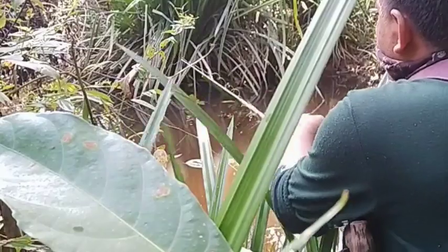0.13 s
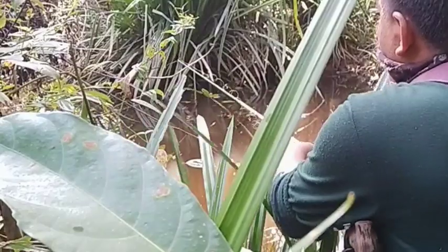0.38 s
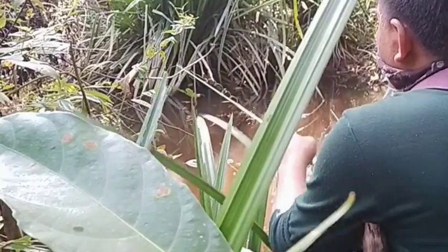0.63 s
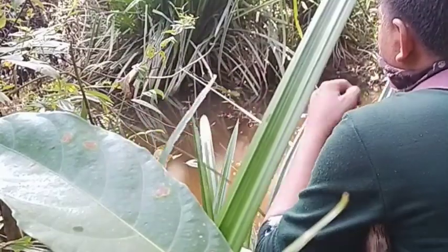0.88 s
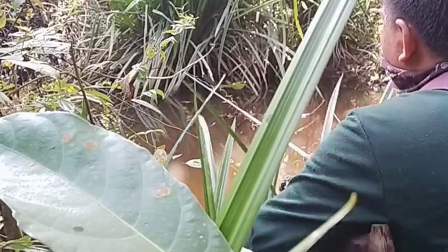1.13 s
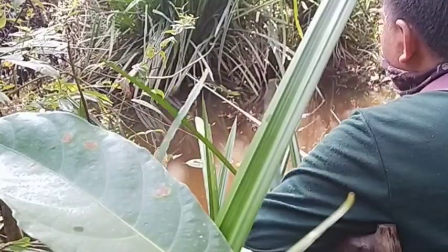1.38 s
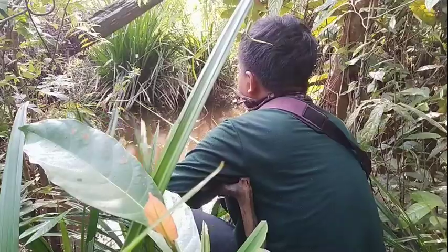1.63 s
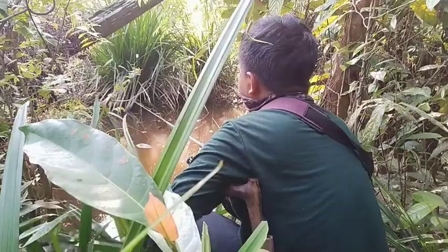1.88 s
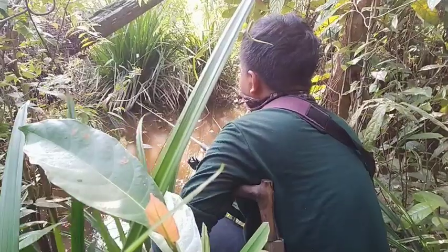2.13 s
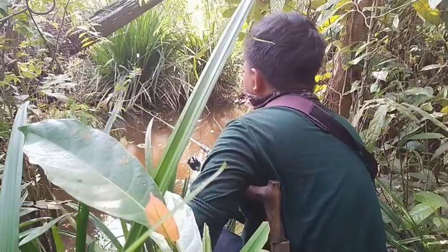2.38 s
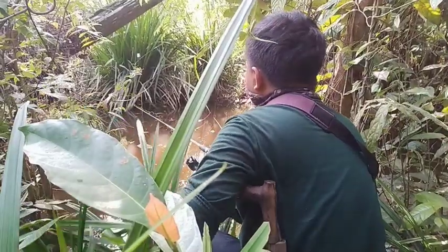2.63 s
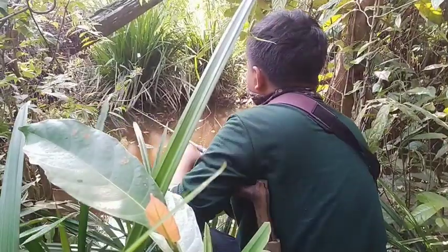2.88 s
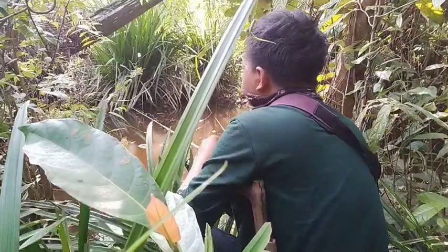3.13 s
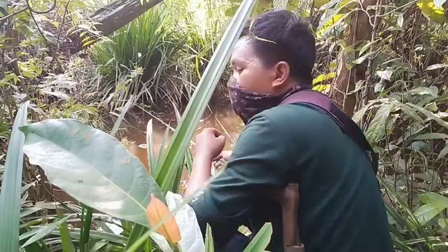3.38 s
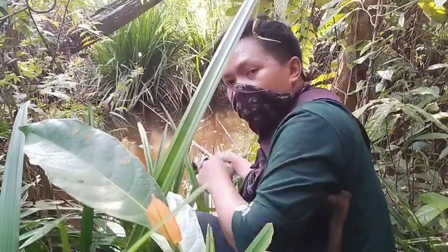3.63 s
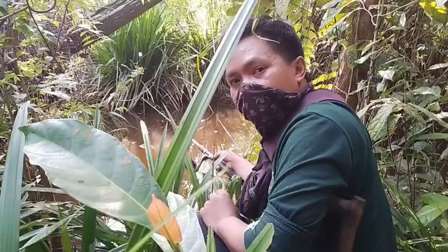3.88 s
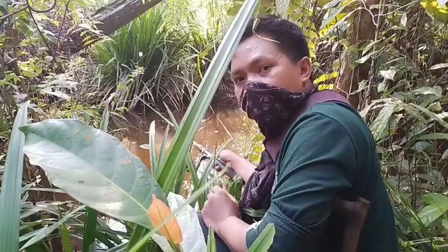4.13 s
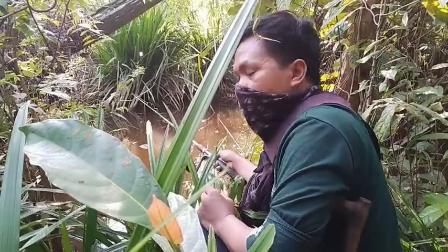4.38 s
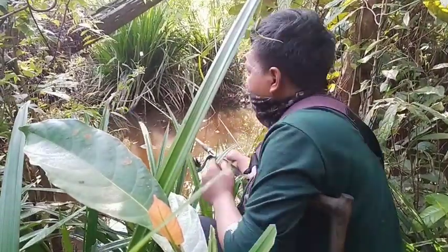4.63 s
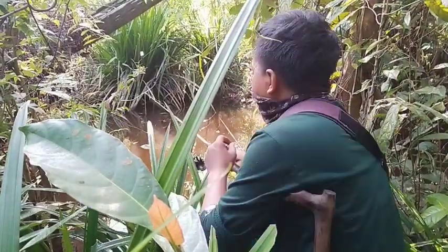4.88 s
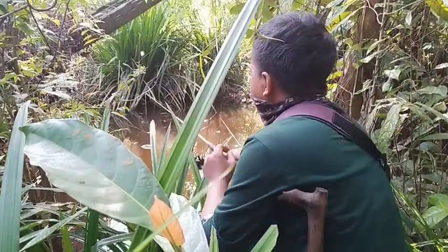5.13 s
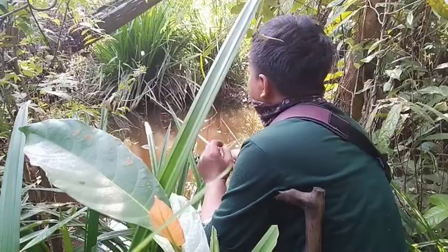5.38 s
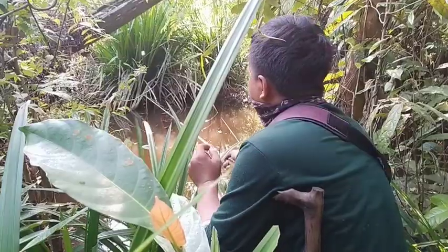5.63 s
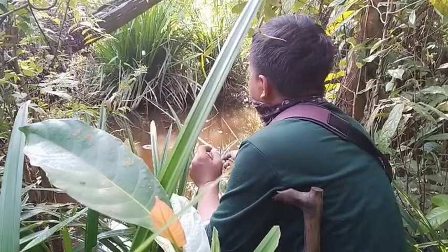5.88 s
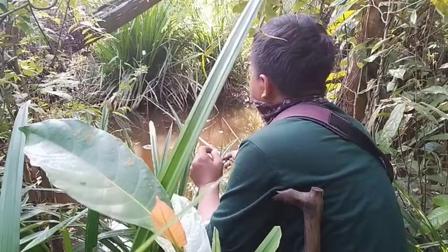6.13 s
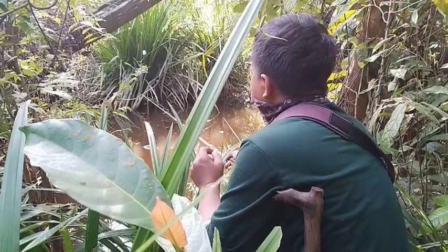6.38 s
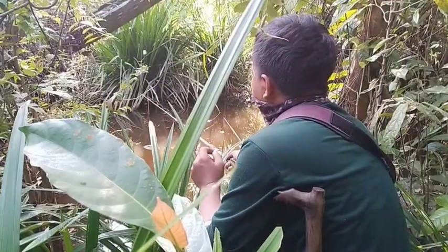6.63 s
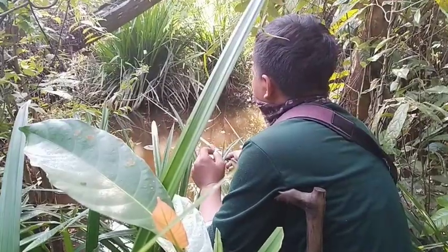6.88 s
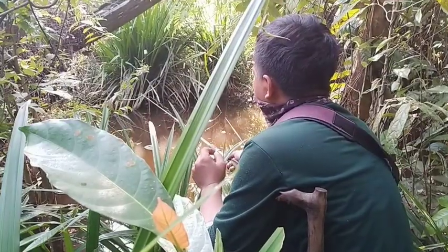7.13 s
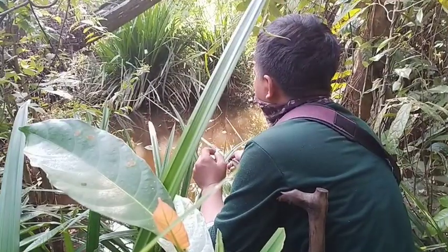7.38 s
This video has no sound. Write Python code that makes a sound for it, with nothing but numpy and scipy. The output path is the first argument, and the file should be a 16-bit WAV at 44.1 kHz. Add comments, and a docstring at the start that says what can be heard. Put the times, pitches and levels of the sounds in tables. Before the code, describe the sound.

Beside a forest creek by day, cicadas drone continuously in shimmering high bands over thin cricket tones and a soft watery wash. Birds give quick whistled notes, buzzing trills and low rolling calls, answered by woody echoes. Around 1.5 seconds a tiny dip marks a splice, then someone crouched near the microphone brushes dry leaves loudly and snaps twigs for about a second, fading to sparse rustles.

```python
"""Forest creek bank by day

Cicadas drone in two high bands with an overtone, two thin cricket tones throb, and creek and far leaves wash.
Near-sine birds glide through hooked notes, whistles and fast trills, or roll low; tapped echoes answer from trees.
Someone crouching near the microphone brushes leaves (crackle and hiss) and snaps twigs (short bursts and modes).
At 1.5 s a splice: the level drops for a moment, and louder brushing follows."""
import sys
import numpy as np
from scipy import signal
from scipy.fft import rfft, irfft
from scipy.io import wavfile
from scipy.ndimage import uniform_filter1d

SR = 44100
rng = np.random.default_rng(int(sys.argv[2]) if len(sys.argv) > 2 else 0)


def gain_from_db(level_db):
    """Turn a decibel level (scalar or array-like) into a linear amplitude factor."""
    decades = np.asarray(level_db, float) / 20
    return 10 ** decades


def file_out(sig):
    """Save sig as 16-bit WAV at sys.argv[1]."""
    # one column per channel
    cols = np.atleast_2d(sig).T
    # limit, then scale
    lim = np.clip(cols, -1, 1)
    pcm = np.round(lim * 32767).astype(np.int16)
    wavfile.write(sys.argv[1], SR, pcm)


N = 331632
T = np.arange(N) / SR  # time axis, s
FLUTTER_DB = 2  # rms unsteadiness of the bird voices' level

# Short rising glide: start_s, pitch_hz (before the pitch factor), level_db (relative)
RISING_GLIDE = [(-.009, 2104, -26), (0, 2578, -3), (.008, 2620, -10)]
# Bright spectrum of dry leaves through a microphone that resonates near 8 and 15 kHz,
# lent to the twig cracks: freq_hz, level_db (relative)
LEAF_TREBLE = [(1500, -25), (3000, -1), (6100, 1), (7000, 6.5), (8300, 7), (9300, -2), (11500, -0.5),
               (13000, 0.5), (14600, 10.5), (15600, 11.5)]


def evened(x):
    """Scales a signal to rms 1."""
    return x / np.sqrt(np.mean(x ** 2) + 1e-20)


def curves(rows):
    """Draws each column of a table as a line over the whole scene; the first column is time."""
    s, *columns = np.transpose(rows)
    return [np.interp(T, s, column) for column in columns]


def coloured(x, points):
    """Filters x by a spectrum given on a log-frequency axis; rms 1."""
    f, level_db = np.transpose(points)
    hz = np.fft.rfftfreq(len(x), 1 / SR)
    gain_db = np.interp(np.log(hz + 1), np.log(f + 1), level_db, left=-70, right=-70)
    return evened(irfft(rfft(x) * gain_from_db(gain_db), len(x)))


def wander(per_s):
    """Random drift of rms 1: noise that falls off steeply above per_s Hz."""
    return evened(coloured(rng.standard_normal(N), [(0, 0), (per_s, -3), (2 * per_s, -30)]))


def clicks(per_s, spread_db):
    """Random clicks of either sign; a few are large."""
    hit, size, sign = rng.random((3, N))
    size_db = -spread_db * np.log(size + .03)
    return (hit < per_s / SR) * gain_from_db(size_db) * np.sign(sign - .5)


def sing(mix, s, hz, level_db, direct_db):
    """Sings one near-sine by summing its pitch into phase, into the direct path and the echo path."""
    tone = np.sqrt(2) * gain_from_db(level_db) * np.sin(2 * np.pi * np.cumsum(hz) / SR)
    at = round(s * SR)
    both = np.array([tone * gain_from_db(direct_db), tone])[:, max(-at, 0):]  # cut what precedes the scene
    part = mix[:, max(at, 0):][:, :both.shape[1]]
    part += both[:, :part.shape[1]]


def note(mix, s, shape, level_db, factor, direct_db):
    """One gliding note of a given shape; smoothed noise on pitch and level makes it a little hoarse."""
    hoarse_hz = 65  # rms
    points_s, points_hz, points_db = np.transpose(shape)
    t = np.arange(points_s[0], points_s[-1], 1 / SR)
    hz, shape_db = np.interp(t, points_s, points_hz), np.interp(t, points_s, points_db)
    hoarse, flutter = (evened(uniform_filter1d(v, 90)) for v in rng.standard_normal((2, len(t))))
    sing(mix, s + t[0], hz * factor + hoarse_hz * hoarse,
         shape_db + level_db + FLUTTER_DB * flutter, direct_db)


def cicadas():
    """Many drumming membranes: uneven click trains ring a low and a high body band and an overtone."""
    # Loudness of the bands: time_s, low_singers_db, high_singers_db, overtone_db
    band_levels = [(0, -49.5, -52.5, -49), (1.48, -50.5, -49, -49.5), (2.9, -49.5, -52.5, -49.5),
                   (5.8, -49.5, -49.5, -49.5), (6.4, -49, -52, -49), (6.7, -48.5, -54, -48),
                   (7.52, -49.5, -56, -48.5)]
    # Spectra of the low singers, high singers and overtone: freq_hz, level_db (relative)
    low_body = [(5900, -34.5), (6400, -14), (6950, -2.5), (7300, -6), (8000, -40), (9000, -25)]
    high_body = [(6800, -33), (7400, -1), (7900, 1.5), (8400, -5.5), (9000, -29)]
    overtone_body = [(6940, -69), (11800, -41), (12600, -34), (12900, -9), (13700, -3), (14500, 2.5),
                     (15400, -18)]
    trains = []
    for per_s in (189.0, 228.0, 267.0, 290, 339.0, 406.0):
        turns = np.cumsum(per_s * (1 + .25 * wander(120))) / SR
        strikes = np.diff(np.floor(turns), prepend=0)
        trains.append(strikes * rng.standard_normal(N))
    far = 0.39 * rng.standard_normal((3, N))  # distant singers melt into hiss
    low, high = sum(trains[::2]), sum(trains[1::2])
    low_db, high_db, overtone_db = curves(band_levels)
    return (gain_from_db(low_db + 0.16 * wander(21)) * coloured(low + far[0], low_body)
            + gain_from_db(high_db + 1.4 * wander(17)) * coloured(high + far[1], high_body)
            + gain_from_db(overtone_db + 1.15 * wander(8.0)) * coloured(low + high + far[2], overtone_body))


def crickets():
    """Two thin sines, an upper and a lower, that waver in pitch and throb in level."""
    # Loudness of the tones: time_s, upper_db, lower_db
    tone_levels = [(0, -57, -78), (1.49, -57, -78), (1.52, -57, -49.5), (2.1, -57, -50), (2.199, -57, -59),
                   (3.8, -60, -73), (6.3, -60, -78), (6.7, -66, -80), (7.52, -69, -80)]
    # Centre pitch of each tone: upper_hz, lower_hz
    pitches = (7769, 4787)
    # Rms pitch waver of each tone: upper_hz, lower_hz
    wavers = (14, 38)
    out = 0
    for hz, level_db, throb_per_s, waver_hz in zip(pitches, curves(tone_levels), (12.4, 30), wavers):
        turns = np.cumsum(hz + waver_hz * wander(60)) / SR
        throb = 1 + 0.4 * np.sin(2 * np.pi * throb_per_s * T)
        out = out + gain_from_db(level_db) * throb * np.sin(2 * np.pi * turns)
    return out


def air():
    """Soft wash of creek and far leaves, shaped noise and clicks, over a low rumble and a flat hiss."""
    # Spectrum of the wash: freq_hz, level_db (relative)
    wash_colour = [(71, -31), (120, 2.5), (221, -0.5), (449, -2), (1970, -6), (3690, -10.5), (4540, -16),
                   (5600, -34), (7280, -34), (12300, -120)]
    # Loudness of the low rumble: time_s, level_db
    rumble_levels = [(0, -62.5), (1.5, -60), (2, -61), (5.5, -58), (6.3, -55), (6.9, -56.5), (7.52, -59.5)]
    wash_db, hiss_db = -60, -64.5
    wash = coloured(rng.standard_normal(N) + 0.84 * clicks(900, 6.0), wash_colour)
    rumble_colour = [(15, -2.5), (40, -7), (75, -3.5), (100, -6.0), (140, -18.0), (260, -25.5)]  # (Hz, dB)
    rumble = coloured(rng.standard_normal(N), rumble_colour)
    hiss = gain_from_db(hiss_db) * rng.standard_normal(N)
    return gain_from_db(wash_db + 0.3 * wander(2.9)) * wash + gain_from_db(curves(rumble_levels)[0]) * rumble + hiss


def birds_and_glides():
    """Bird calls and stray glides sung into a direct path and an echo path, which passes through the wood."""
    mix = np.zeros((2, N))
    for voice in (trills, rolls, falls, openings, stray_glides):
        voice(mix)
    return gain_from_db(-2) * mix[0] + wood_echo(mix[1])


def trills(mix):
    """Fast trills: the pitch sweeps upward again and again, then settles on a short held end."""
    # Trills: settle_s, sweeps_length_s, level_db, direct_against_echoes_db (relative), pitch_factor
    trill_calls = [(0.195, 0.25, -46.5, -12, 0.94), (.938, 0.33, -35.5, -0.5, 0.99),
                   (1.289, 0.26, -50, 8, 0.95), (1.761, 0.27, -34, 0, 0.97), (3.022, 0.29, -33.5, -7, 0.95),
                   (3.388, 0.17, -48, -1, 0.96), (4.44, 0.34, -38, 3, 1.01), (5.539, 0.34, -36, -9.5, 0.98),
                   (6.13, 0.25, -49.5, 2, 0.94), (6.829, 0.34, -36.5, -9, 0.97)]
    # Course of a trill: share_of_length, bottom_hz, top_hz (before the pitch factor), level_db (relative)
    trill_course = [(0, 2900, 4027, -13.5), (.3, 2598, 4360, -11), (0.698, 2531, 4300, -6.5),
                    (0.9, 2879, 4365, -3.5), (0.996, 3925, 4062, -1.5)]
    sweeps_per_s, hold_s, close_db = 96, 0.025, -4
    hoarse_hz, held_rough = 42, 1.1  # rms in the sweeps; factor on roughness and flutter in the held end
    share, *course = np.transpose(trill_course)
    for settle, length, level_db, direct_db, factor in trill_calls:
        drift = wander(30)  # uneven pace
        t = np.arange(-length, hold_s, 1 / SR)
        sweeping = t < 0
        bottom, top, swell_db = (np.interp(1 + t / length, share, column) for column in course)
        turn = (t * sweeps_per_s + .15 * drift[:len(t)]) % 1
        breath_db = -18 * sweeping * abs(2 * turn - 1) ** 6  # the voice shuts between sweeps
        breath_db += np.where(sweeping, 7 * (turn - .6), close_db)  # louder towards the top
        rough = np.where(sweeping, 1, held_rough)
        hoarse, flutter = (evened(uniform_filter1d(v, 60)) * rough for v in rng.standard_normal((2, len(t))))
        end_db = -25 * np.clip((t - t[-1]) / 0.012 + 1, 0, 1)
        hz = factor * (bottom + (top - bottom) * turn ** 0.95) + hoarse_hz * hoarse
        sing(mix, settle - length, hz,
             level_db + FLUTTER_DB * flutter + swell_db + breath_db + end_db, direct_db)


def rolls(mix):
    """Rolling calls: a dipping note, a pip, then a climbing roll of short pips with a husky top."""
    # Calls: start_s, level_db, roll_s, direct_against_echoes_db (relative), top_of_swing_db, climb_hz
    roll_calls = [(-.221, -43.5, .371, 4, 4, 240), (1.199, -44, .093, 5, -15, 110),
                  (2.524, -43, .35, 10, -3, 80), (4.411, -44, .344, 8, 4, 110),
                  (5.92, -42.5, .36, 4, 0, 200)]
    # Dipping note: start_s, pitch_hz (before the pitch factor), level_db (relative)
    dip = [(0, 4340, -8), (.006, 3914, -0.5), (.014, 2500, -5.5), (.02, 2066, -19), (.026, 2593, -8),
           (.033, 3215, -1.5), (.046, 3423, -2.5), (.058, 3300, -31)]
    pip_after_s, roll_after_s = .116, .188
    dips_per_s, full_roll_s = 43.2, 0.39  # pace before rounding to whole dips; time for the swing to grow
    start_hz, swing_hz = 2480, 259.4
    climb_db_per_hz, top_full = .055, 0.62  # louder as it climbs; growth at which the top is full
    echo_grows_db = 5  # the wood answers the start of a roll more weakly
    for s, level_db, length, direct_db, top_db, climb_hz in roll_calls:
        note(mix, s, dip, level_db + 4, 0.99, -1)
        note(mix, s + pip_after_s, RISING_GLIDE, level_db - 4, 0.96, direct_db + 4)
        period = length / round(length * dips_per_s)
        t = np.arange(-period / 2, length + period / 4, 1 / SR)
        grown = np.clip(t / full_roll_s, 0, 1)
        up = np.sin(np.pi * t / period) ** 2  # 0 at the bottom of each dip
        below_hz = climb_hz * np.clip(1 - t / length, 0, 1)
        hoarse = wander(204)[:len(t)]
        hz = start_hz + climb_hz - below_hz
        early_db = echo_grows_db * (1 - grown)
        at = s + roll_after_s + t[0]
        # a short pip in each dip
        pips_db = level_db - climb_db_per_hz * below_hz - 22 * up - early_db
        sing(mix, at, hz + 90 * up + 50 * hoarse, pips_db, direct_db + early_db)
        # the husky top, mostly heard through the echoes
        top_hz = hz + (60 + swing_hz * grown) * up + 150 * hoarse
        husky_db = level_db + top_db - 22 * np.clip(1 - grown / top_full, 0, 1) - 25 * (1 - up) ** 2
        sing(mix, at, top_hz, husky_db, direct_db - 17)


def wood_echo(x):
    """Sparse taps from trunks and leaves dying away; three sets fade into each other to stay diffuse."""
    # Clumps of trunks that echo more strongly: delay_s, boost_db
    clumps = [(0.01, 0), (0.046, 2), (0.089, 9.5)]
    near_t60, near_db, far_t60, far_db = 0.3, 0, 0.9, -12  # near trunks and the far wood (s, dB)
    t, out = np.arange(SR) / SR, 0
    clumps_db = sum(echo_db * np.exp(-((t - s) / 0.007) ** 2) for s, echo_db in clumps)
    for k in range(3):
        taps, at = np.zeros(SR), np.arange(100, SR - 22, 22)
        taps[at + rng.integers(0, 22, len(at))] = rng.standard_normal(len(at))
        near = taps * gain_from_db(clumps_db - 60 * t / near_t60)
        far = taps * gain_from_db(-60 * t / far_t60)
        tail = gain_from_db(near_db) * near / np.linalg.norm(near) + gain_from_db(far_db) * far / np.linalg.norm(far)
        share = np.sqrt(2 / 3) * np.cos(np.pi * (2.3 * T + k / 3))
        out = out + signal.oaconvolve(x * share, tail)[:N]
    return out


def rustle():
    """Clumped crackle of dry leaves in a hiss of cloth, under the steady push and the single brushes."""
    # Duller spectrum of the brushing: freq_hz, level_db (relative)
    leaf_low = [(100, -9), (250, -6.5), (520, -2), (1000, 1), (2800, 1), (4500, -11)]
    # How hard the body pushes through the leaves: time_s, level_db
    movement = [(0, -58), (1.2, -61.5), (1.49, -51), (1.52, -37.5), (1.65, -31.5), (1.78, -37), (2.0, -33),
                (2.07, -37), (2.33, -33), (2.45, -44), (2.75, -47.5), (2.85, -55), (3.2, -46), (3.45, -54),
                (3.9, -58), (4.3, -48.5), (4.9, -64), (6.2, -53.5), (7.5, -72)]
    # Single brushes of a leaf: peak_s, treble_db, length_s, low_db
    brushes = [(0.066, -48, 0.033, -61), (0.13, -49, .02, -68), (0.547, -47.5, 0.085, -58.5),
               (0.664, -48, 0.099, -61), (0.764, -47, 0.023, -71), (0.998, -47, 0.044, -72),
               (1.29, -48.5, 0.067, -74), (1.395, -50, 0.027, -63), (1.471, -41, 0.03, -57),
               (1.63, -43, 0.14, -44.5), (1.91, -51, 0.037, -47), (2.121, -29.5, 0.046, -39.5),
               (2.164, -38, 0.057, -41.5), (2.289, -33.5, 0.015, -45), (2.412, -33.5, 0.048, -53),
               (2.485, -35.5, 0.082, -50), (2.585, -49, 0.041, -49), (2.642, -40, 0.11, -53),
               (2.744, -42.5, 0.08, -68), (3.087, -44, 0.035, -48), (3.122, -42, 0.062, -66),
               (3.238, -48, 0.072, -50.5), (3.308, -43, .05, -63), (3.487, -48, 0.12, -54.5),
               (3.628, -45, 0.018, -67), (3.698, -48, 0.023, -68), (3.76, -51, .04, -75),
               (4.008, -59, 0.037, -53.5), (4.226, -61, 0.1, -54.5), (4.47, -63, 0.034, -54),
               (4.5, -55, 0.016, -58), (4.538, -59, 0.023, -65), (4.659, -48, 0.02, -50.5),
               (4.72, -48.5, 0.14, -58), (4.962, -51, 0.037, -55), (5.779, -85, 0.052, -59),
               (5.947, -52, 0.023, -56), (6.086, -53, 0.037, -58), (6.166, -47, 0.13, -58),
               (6.57, -58, 0.11, -57.5), (6.87, -63, 0.092, -58)]
    low_push_db, low_follows = -43.5, 0.79  # low part at a push of -35 dB; share of the changes it follows
    rise_share = 0.21  # rise time as a share of the length
    crackle = evened(clicks(4000, 2.2))
    layers = []
    for grain, colour in ((1.05, LEAF_TREBLE), (1.15, leaf_low)):
        clumping = gain_from_db(1.0 * wander(24.0) + 1.04 * wander(140))
        layers.append(coloured(clumping * (grain * crackle + rng.standard_normal(N)), colour))
    high, low = layers
    push_db = curves(movement)[0]
    power = gain_from_db(2 * np.array([push_db, low_push_db + low_follows * (push_db + 35)]))
    for s, high_db, length, low_db in brushes:
        bump = np.exp(-4 * ((T - s) / np.where(T < s, rise_share * length, length)) ** 2)
        power = power + gain_from_db(2 * np.array([[high_db], [low_db]])) * bump
    return np.sqrt(power[0]) * high + np.sqrt(power[1]) * low


def falls(mix):
    """Falling notes that close the long rolls: one shape whose drop is stretched or shrunk."""
    # Falling notes: start_s, level_db, share_of_full_drop, direct_against_echoes_db (relative)
    fall_calls = [(.338, -44, 1.04, 7), (3.064, -47.5, 0.44, 14.5), (4.943, -44.5, 1.05, 8),
                  (6.474, -43.5, 1.02, 4)]
    # Shape of the full drop: start_s, pitch_hz (before the pitch factor), level_db (relative)
    fall_shape = [(0, 2720, -37), (.008, 2580, -1.5), (.018, 2430, 2), (.032, 2110, -10), (.041, 1950, -43)]
    start_hz = fall_shape[0][1]
    for s, level_db, drop, direct_db in fall_calls:
        shape = [(t, start_hz + drop * (hz - start_hz), shape_db) for t, hz, shape_db in fall_shape]
        note(mix, s, shape, level_db, 0.99, direct_db)


def openings(mix):
    """The trilling birds' opening: a hooked gliding note, then a softer whistle."""
    # Openings: start_s, level_db, pitch_factor, direct_against_echoes_db (relative)
    opening_calls = [(.435, -33.5, 0.99, 1), (2.523, -32, 0.98, 1), (3.707, -45, 0.96, -8),
                     (3.915, -34, 0.98, -1.5), (4.743, -42.5, 1, -6), (5.012, -32.5, 0.98, -7),
                     (5.67, -44.5, 0.98, -3), (6.292, -33, 0.99, -1.5)]
    # Hook and whistle shapes: start_s, pitch_hz (before the pitch factor), level_db (relative)
    hook = [(.008, 3784, -21), (.016, 3667, -5.5), (.024, 2424, -12), (.03, 3293, -6), (.04, 4150, -5),
            (.046, 4456, -6.5), (.051, 4150, -34)]
    whistle = [(0, 2630, -6), (.008, 2935, -16), (.016, 3174, -2.5), (.032, 3200, -6), (.042, 3360, -29)]
    whistle_after_s, whistle_db = .115, -6.5
    for s, level_db, factor, direct_db in opening_calls:
        note(mix, s, hook, level_db, factor, direct_db)
        note(mix, s + whistle_after_s, whistle, level_db + whistle_db, factor, direct_db)


def snaps():
    """Twig snaps: a crack of noise dying in a few ms, a duller knock and the short ring of the wood."""
    # Snaps: start_s, crack_db (relative), knock_against_crack_db (relative)
    twig_snaps = [(0.5455, -32.5, -3), (0.757, -36, -24.5), (1.3005, -43, -26), (1.732, -22, -15),
                  (1.839, -31.5, 2), (1.89, -34.5, 2.5), (1.955, -34, 2), (2.1199, -29, -10),
                  (2.1246, -30, -2), (2.18, -38, 0), (2.273, -22.5, -10), (2.326, -33, -6), (2.655, -35, 2),
                  (2.7332, -28.5, -20), (3.091, -48, -8), (3.44, -36, -14), (3.61, -46, -15),
                  (3.6796, -40, -13), (3.7, -41, -21), (3.728, -37, -24), (3.751, -41, -25),
                  (4.471, -43, 7), (4.548, -35, -18), (4.6557, -43, -3), (6.4673, -51, 6),
                  (6.8529, -48, 11)]
    # Modes of a knocked stick: freq_hz (before a random detune), level_db (relative), t60_s
    stick_modes = [(877, -2, .035), (1100, 0, .04), (1400, -1, .03), (1750, -2, .025)]
    out, t = np.zeros((3, N)), np.arange(SR // 16) / SR  # crack, knock and ring
    rise = 1 - np.exp(-t / 0.00094)
    for s, level_db, low_db in twig_snaps:
        crack, knock = rng.standard_normal((2, len(t))) * rise
        at = round(s * SR)
        place = slice(at, at + len(t))
        out[0, place] += gain_from_db(level_db) * crack * (gain_from_db(-60 * t / 0.013) + 0.11 * gain_from_db(-60 * t / 0.086))
        out[1, place] += gain_from_db(level_db + low_db - 60 * t / 0.02) * knock
        detunes = rng.uniform(0.917, 1.086, len(stick_modes))
        for (hz, mode_db, t60), detune in zip(stick_modes, detunes):
            ring_db = level_db + low_db + mode_db - 60 * t / t60
            out[2, place] += gain_from_db(ring_db) * np.sin(2 * np.pi * hz * detune * t)
    bright = coloured(out[0], LEAF_TREBLE) * np.std(out[0])
    dull = signal.lfilter(*signal.butter(2, [850, 3000], "band", fs=SR), out[1])
    return gain_from_db(2.5) * bright + gain_from_db(8.5) * dull + gain_from_db(-9) * out[2]


def stray_glides(mix):
    """Short rising glides: stray low bird pips, a thin squeak near 12 kHz and a small tick near 5 kHz."""
    # Glides: start_s, level_db, pitch_factor, direct_against_echoes_db (relative)
    glides = [(1.902, -36.5, 1.05, 6.5), (1.954, -43, 0.79, 3), (3.208, -47, 4.9, 0), (3.222, -51, 5, 2.5),
              (5.521, -60, 2.1, 7), (5.83, -50.5, 0.74, -2), (6.143, -44, 0.83, 1), (6.183, -56, .82, 6),
              (6.778, -43, .99, 1), (6.969, -53, 0.69, 0), (7.055, -50.5, 0.71, 1), (7.344, -50.5, 0.75, 2),
              (7.405, -52.5, 0.77, 4)]
    for s, level_db, factor, direct_db in glides:
        note(mix, s, RISING_GLIDE, level_db, factor, direct_db)


def scene():
    """All sources summed at one microphone, under one gain curve, copied to both channels."""
    # Gain of the whole scene, dropping for a moment at a splice: time_s, gain_db
    splice_gain = [(1.49, 1.5), (1.501, -10), (1.512, 3), (1.525, 1.5)]
    mono = cicadas() + crickets() + air() + birds_and_glides() + rustle() + snaps()
    return np.tile(mono * gain_from_db(curves(splice_gain)[0]), (2, 1))


def band_limit(x):
    """A steep low-pass at the top of the band."""
    return signal.sosfilt(signal.butter(12, 16720, fs=SR, output="sos"), x)


def record(dry):
    """Finishes the mix with a steep low-pass, a long windowed FIR filter."""
    edge_hz = 15520
    lowpass = signal.firwin(801, edge_hz, window=("kaiser", 10), fs=SR)
    limited = signal.oaconvolve(dry, lowpass[None], "same")
    return band_limit(limited)


dry = scene()
out = record(dry)
file_out(out)
```